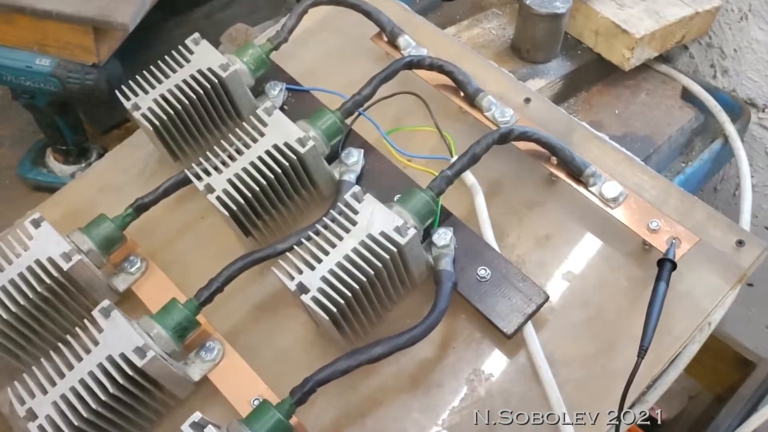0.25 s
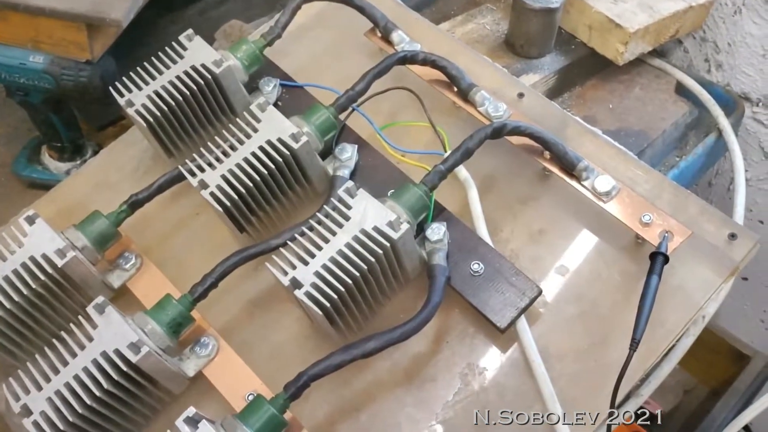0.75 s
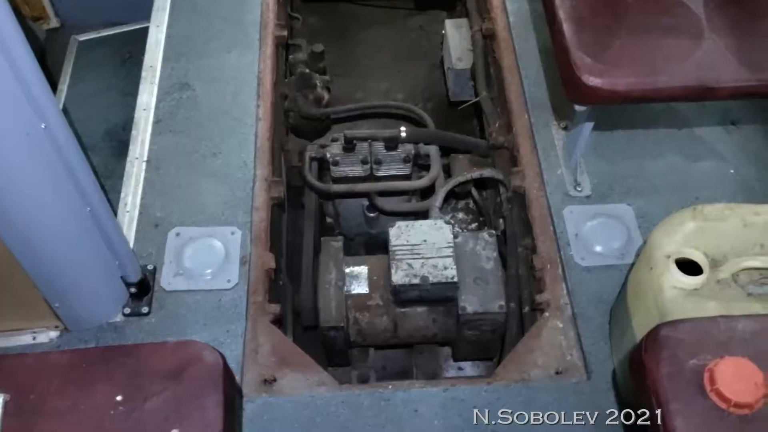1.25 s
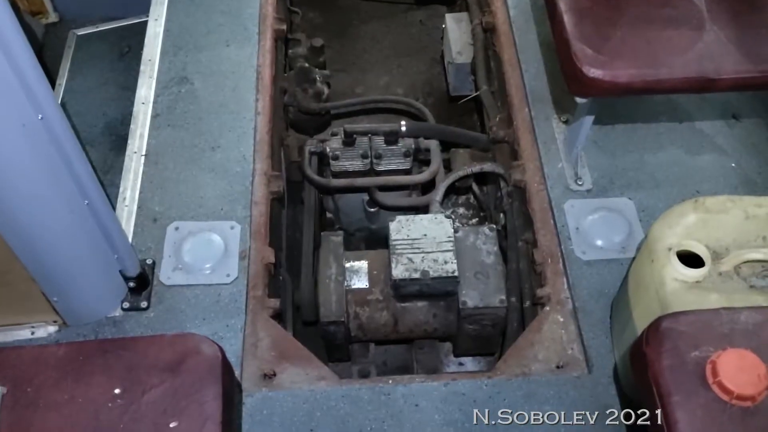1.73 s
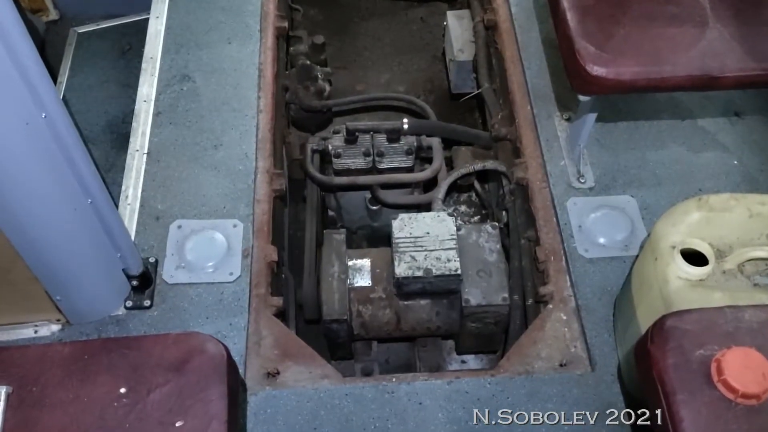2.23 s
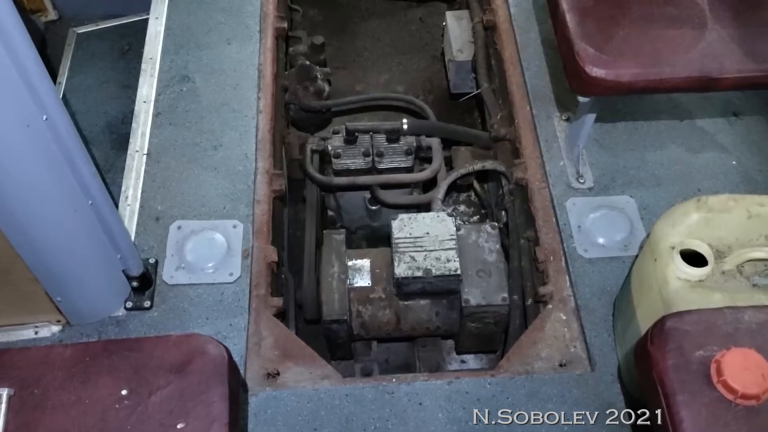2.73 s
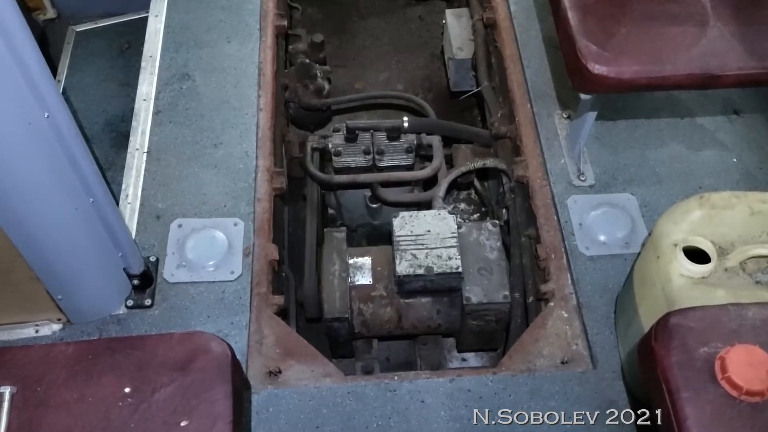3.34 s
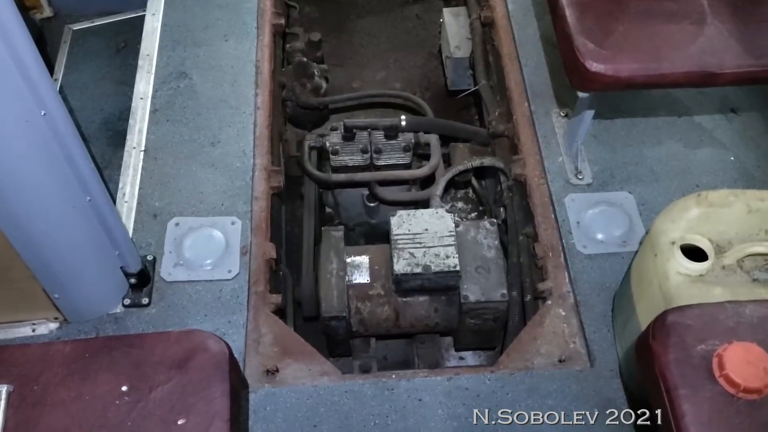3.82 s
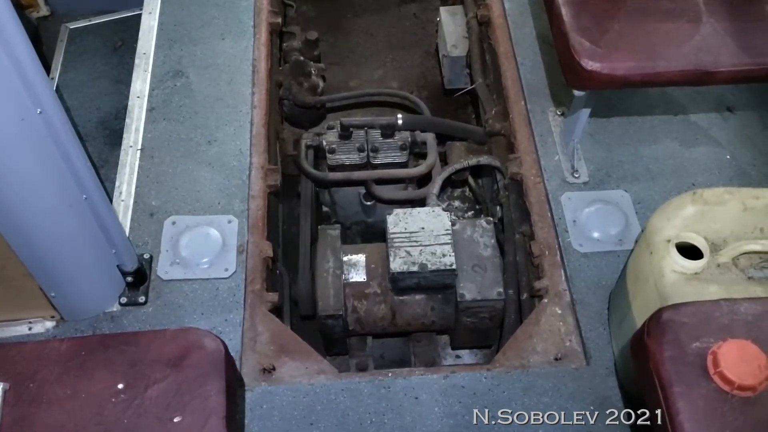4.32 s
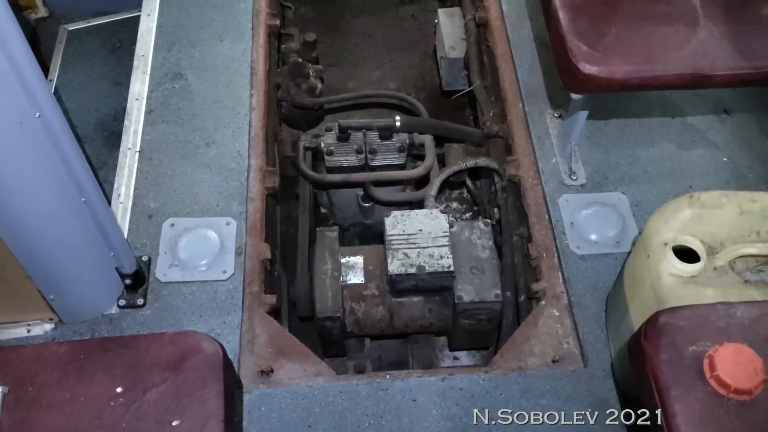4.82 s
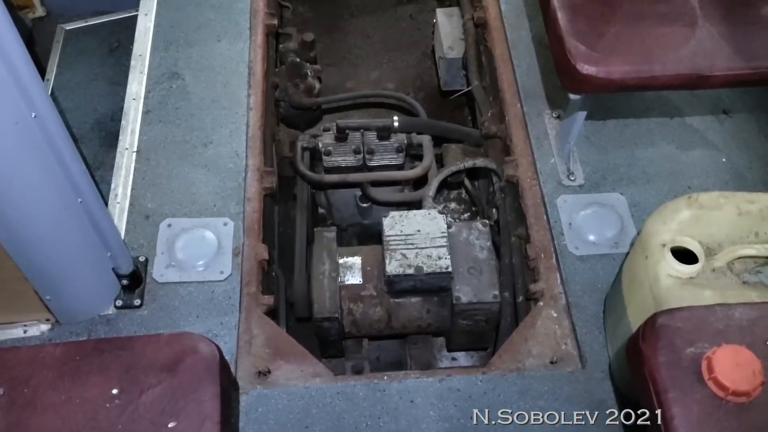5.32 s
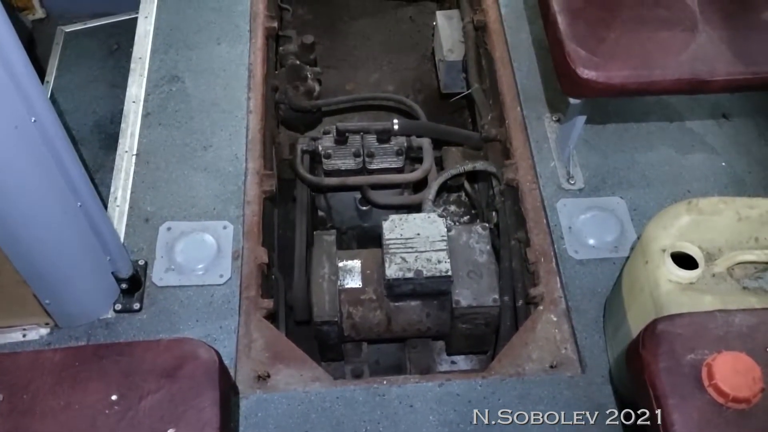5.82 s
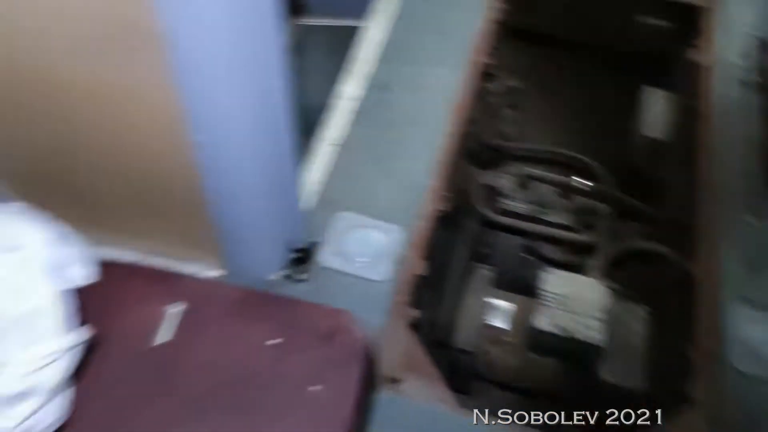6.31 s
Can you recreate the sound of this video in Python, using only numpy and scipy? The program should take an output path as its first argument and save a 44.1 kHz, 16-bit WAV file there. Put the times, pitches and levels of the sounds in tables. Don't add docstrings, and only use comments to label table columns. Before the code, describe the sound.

A faint room hum and soft tap cut to a rapid, rattling two-cylinder compressor with whine and hiss, two dull thumps and a sharp knock.

```python
import sys
import numpy as np
from scipy import signal
from scipy.fft import rfft, irfft
from scipy.io import wavfile
from scipy.ndimage import uniform_filter1d

SR = 44100
rng = np.random.default_rng(int(sys.argv[2]) if len(sys.argv) > 2 else 0)


def digitize_waveform(pressure):
    field = np.atleast_2d(pressure).T
    bounded = np.clip(field, -1, 1)
    quanta = np.round(bounded * 32767).astype(np.int16)
    wavfile.write(sys.argv[1], SR, quanta)


def gain_from_db(level_db):
    decades = np.asarray(level_db, float) / 20
    return 10 ** decades


N = 289296
T, HZ = np.arange(N) / SR, np.fft.rfftfreq(N, 1 / SR)
KNOCK_S = 6.0952
# time in seconds, turns a second.
CRANK_SPEED = [(0, 12.592), (6.56, 12.5753)]


def evened(x):
    return x / np.sqrt(np.mean(x ** 2) + 1e-20)


def read(points, at, column=1):
    table = np.transpose(points)
    return np.interp(np.log(at + 1), np.log(table[0] + 1), table[column])


def drift(hz):
    t = T[::256]
    waves = [np.sin(2 * np.pi * (f * t + rng.random())) for f in np.geomspace(hz / 20, hz, 16)]
    return np.interp(T, t, evened(sum(waves)))


def ring(hz, t60, size=6000, soft=0.):
    t = np.arange(size) / SR
    rise = 1 - np.exp(-t / (soft + 1e-9))
    return np.sin(2 * np.pi * hz * t) * gain_from_db(-60 * t / t60) * rise


def narrow(hz, width):
    pole = np.exp((2j * np.pi * hz - np.pi * width) / SR)
    return evened(signal.lfilter([1], [1, -pole], rng.standard_normal(N) + 0j).real)


def noise(spectrum, same, extra_db=lambda hz, t: 0, patchy_db=1., edge_hz=15520):
    frames, hz = N // 128 + 5, np.fft.rfftfreq(512, 1 / SR)[:, None]
    a, b, c, d, patches = rng.standard_normal((frames, 257, 5)).T
    patches = evened(uniform_filter1d(uniform_filter1d(patches, 6, 0), 20, 1))
    like = np.clip(read(same, hz), -1, 1)
    left = a + 1j * b
    right = like * left + np.sqrt(1 - like ** 2) * (c + 1j * d)
    z = np.array([left, right])
    z *= gain_from_db(patchy_db * patches + extra_db(hz, np.arange(frames) * 128 / SR))
    x = signal.istft(z, nperseg=512, noverlap=384)[1][:, :N]
    return evened(irfft(rfft(x) * gain_from_db(read(spectrum, HZ)) * (HZ < edge_hz), N))


def finger_tap():
    # pitch in Hz, t60 in seconds, left level in dB, right level in dB.
    tap_modes = [(145, 0.013, -6.5, -42), (396, 0.012, -22, -49), (840, 0.007, -20, -38),
                 (1320, 0.0091, -21, -31)]
    out, at = np.zeros((2, N)), round(1.0272 * SR)
    for k, (hz, t60, left_db, right_db) in enumerate(tap_modes):
        sign = (-1) ** (k // 3)
        out[:, at:at + 6000] += sign * gain_from_db([[left_db], [right_db]]) * ring(hz, t60, soft=.0016)
    return out


def workshop():
    # pitch in Hz, level in dB per Hz.
    wash_spectrum = [(25, -28), (50, -13), (110, -12.5), (170, -17), (330, -24.5), (600, -31.5),
                     (1200, -32.5), (2500, -41), (4600, -44.5), (5000, -52.5), (12500, -54), (14800, -66)]
    # pitch in Hz, left-right correlation.
    wash_same = [(60, 0.52), (240, 0.3), (950, -0.054), (3770, 0.0), (15000, -0.096)]
    # time in seconds, level in dB.
    wash_level = [(0.0, -61), (0.588, -59.5), (0.756, -60), (1.1, -59)]
    # pitch in Hz, width in Hz, level in dB.
    far_hum = (79.5, 3, -57)
    wash = noise(wash_spectrum, wash_same, patchy_db=1.0, edge_hz=14900)
    out = gain_from_db(np.interp(T, *np.transpose(wash_level)) + 3.5) * wash
    hz, width, db = far_hum
    out += gain_from_db(db) * evened(np.sin(2 * np.pi * hz * T) + 0.41 * narrow(hz, width))
    out += finger_tap()
    out = irfft(rfft(out) * np.clip(HZ / 71.0, 0, 1), N)
    cut_s = 1.106
    return out * np.clip((cut_s - T) / .003, 0, 1)


def crank(t):
    (_, first), (end, last) = CRANK_SPEED
    start_turns = -.4335
    return start_turns + first * t + (last - first) / end * t ** 2 / 2


def strokes():
    parts = [(3, 8, .3381, .46, .47), (9, 13, .8244, .5868, -.52), (14, 18, .0007, .488, .06),
             (19, 25, .9147, .696, .38), (26, 33, .1261, .2914, .52), (34, 40, .1654, .397, -1.16),
             (41, 46, .4329, .5221, .31), (47, 55, .6582, .376, .05), (56, 63, .5207, .471, 1.03),
             (64, 77, .9491, .2023, .88)]
    # pitch in Hz, width in Hz, share of the second blow.
    bodies = [
        (89, 12, 1),
        (135.8, 19, .74),
        (188, 25, .97),
        (275, 35, .51),
        (342, 28, -.33),
        (499, 20, -.42),
        (599, 83, -.8),
        (601, 26, -.59),
        (692, 31, -.3),
        (910, 175, -.65),
    ]
    part_db = [-39, -27, -34, -39, -40.5, -41.5, -37.5, -39, -44, -56]
    spread = 0.021
    out, grid = np.zeros((2, N)), np.arange(1025) / 1024
    for (first, last, angle, gap, glide), (hz, width, share), level_db in zip(parts, bodies, part_db):
        order = np.arange(first, last + 1)
        blows = 1 + share * np.exp(-2j * np.pi * order * gap)
        mode = 1 / (1 + 2j * (order * CRANK_SPEED[0][1] - hz) / width)
        sweep = np.pi * glide * (order - first) ** 2 / len(order)
        skew = spread * first * rng.standard_normal(len(order)) * np.array([[1], [-1]]) / 2
        z = np.zeros((2, 513), complex)
        z[:, first:last + 1] = blows * mode * np.exp(1j * (skew - sweep))
        one_turn = 512 * np.sqrt(2) * irfft(z)
        place = crank(T) - angle + 0.0017 * drift(4.1)
        sound = np.array([np.interp(place % 1, grid, np.r_[side, side[0]]) for side in one_turn])
        out += gain_from_db(level_db + 0.6 * drift(9.)) * sound
    return out


def whine():
    # pitch in Hz, width in Hz, level in dB.
    housing = [(1060, 40, -47), (1207, 10, -38), (1360, 14, -48), (1588, 14, -42), (1790, 50, -46),
               (1962, 20, -39), (2355, 30, -50), (2675, 50, -49), (4865, 120, -49)]
    apart = np.array([sum(gain_from_db(db) * narrow(hz, width) for hz, width, db in housing) for _ in "LR"])
    load_db = 2.4 * np.cos(2 * np.pi * (crank(T) - .15)) + 1.1 * drift(4.)
    return gain_from_db(load_db + 1.0) * (apart + 0.12 * apart[::-1])


def air():
    # pitch in Hz, level in dB per Hz.
    air_spectrum = [(25, -15), (60, -17.5), (140, -11.5), (230, -8), (400, -14), (560, -18), (775, -18.5),
                    (1150, -12), (2000, -20), (3340, -24), (4700, -22), (6500, -22), (7000, -27.5),
                    (9000, -34), (15000, -29.5)]
    # pitch in Hz, left-right correlation.
    air_same = [(30, 0.9), (150, 1), (280, 0.8), (500, 0.82), (800, 0.71), (1400, 0.56), (15000, 0.13)]
    # pitch in Hz, once-a-turn depth in dB, loudest crank angle in turns,
    # twice-a-turn depth in dB.
    swell = [(500, 0, .2, 0), (2500, 1.3, .17, .2), (4800, 3.4, .17, .9), (6200, 2.7, .12, 1.4),
             (8000, 1.4, .15, .5), (11000, 1.2, .05, .9), (13200, .3, .05, 1.3), (14300, 3.6, .03, 2.)]

    def throb(hz, t):
        once = np.cos(2 * np.pi * (crank(t) - read(swell, hz, column=2)))
        twice = np.cos(4 * np.pi * (crank(t) - .05))
        return read(swell, hz) * once + read(swell, hz, column=3) * twice
    return gain_from_db(-26) * noise(air_spectrum, air_same, throb, patchy_db=0.26)


def valves():
    # crank angle in turns, level in dB.
    ticks = [(.07, -29), (.17, -34), (.275, -29.5)]
    blows = np.zeros((2, N))
    for angle, db in ticks:
        at = np.flatnonzero(np.diff(np.floor(crank(T) - angle)))
        blows[:, at] = gain_from_db(db + 3.1 * rng.standard_normal((len(at), 2)).T)
    reed = ring(4750, .008, size=900) + ring(5900, .006, size=900)
    return signal.oaconvolve(blows, reed[None])[:, :N]


def cabin(ripple_db=3.0, turn_rad=1.62):
    rough = rng.standard_normal((len(HZ), 2, 2)).T
    ripple, turn = uniform_filter1d(uniform_filter1d(rough, 150), 150)
    slow = uniform_filter1d(rng.standard_normal((len(HZ), 2)).T, 2500)
    share = np.clip((HZ - 500) / 600, 0, 1)
    phase = 0.34 * evened(turn) + turn_rad * evened(slow)
    return gain_from_db(share * ripple_db * evened(ripple)) * np.exp(1j * share * phase)


def floor_bumps():
    # time in seconds, pitch in Hz, t60 in seconds, level in dB.
    jolt = (1.393, 45, .05, -21)
    footstep = (2.5, 117, .035, -12)
    out = np.zeros((2, N))
    for s, hz, t60, db in (jolt, footstep):
        at = round(s * SR)
        out[:, at:at + 6000] += gain_from_db(db) * ring(hz, t60, soft=0.0037)
    return out


def knock():
    # pitch in Hz, level in dB, t60 in seconds.
    knock_modes = [(1400, -16, .015), (1750, -16, .04), (4000, -11, .009), (4950, -7, .011),
                   (5900, -11, .009), (7900, -14, .006), (9600, -18, .005), (12000, -19, .004),
                   (14200, -17, .004), (16000, -24, .003)]
    # pitch in Hz, level in dB per Hz.
    tail_spectrum = [(900, -30), (1700, 0), (2600, -12), (3600, -12), (4500, -5), (6300, -4), (6900, -20),
                     (16000, -28)]
    out, at = np.zeros((2, N)), round(KNOCK_S * SR)
    tick = sum((-1) ** k * gain_from_db(db) * ring(hz, t60, soft=.0004) for k, (hz, db, t60) in enumerate(knock_modes))
    out[:, at:at + 6000] = tick * gain_from_db([[-4.], [-1.5]])
    since = T - KNOCK_S
    tail = noise(tail_spectrum, [(100, .3), (9000, .1)], patchy_db=3.)
    return out + gain_from_db(-21.5 - 60 * abs(since) / 0.61) * np.clip((since - .003) / 0.0071, 0, 1) * tail


def scene():
    # pitch in Hz, left minus right in dB.
    lean = [(60, 2.5), (150, -1), (300, 1.5), (600, 2), (950, -2), (2380, -1), (5980, -2.0), (9000, 1),
            (15000, -4)]
    # pitch in Hz, width in Hz, depth in dB.
    dips = [(2950, 160, -5), (3350, 200, -6), (3950, 350, -5.5), (7100, 250, -4), (8400, 400, -4),
            (8920, 200, -9), (10000, 300, -5), (11500, 500, -4), (13800, 300, -3)]
    # time in seconds, level in dB.
    fade = [(1.192, -41), (1.2, -26.5), (1.238, -14.5), (1.33, -6.5), (1.385, -3.5), (1.395, -2.5),
            (1.45, 2), (1.6, 1.5), (6.56, 1.5)]
    spectrum = rfft(strokes() + whine()) + cabin() * rfft(air() + valves())
    colour_db = read(lean, HZ) * np.array([[.5], [-.5]])
    colour_db += sum(db * np.exp(-((HZ - hz) / width) ** 2 * 2) for hz, width, db in dips)
    machine = irfft(spectrum * gain_from_db(colour_db), N)
    duck_db = -7 * np.exp(-((T - KNOCK_S + .002) / .003) ** 2)
    machine = machine * gain_from_db(duck_db) + floor_bumps() + knock()
    fade_from_s = 1.192
    return workshop() + machine * gain_from_db(np.interp(T, *np.transpose(fade))) * (T > fade_from_s)


def low_pass(x):
    return signal.sosfilt(signal.butter(12, 16670, fs=SR, output="sos"), x)


def record(dry):
    # pitch in Hz, dB a band may sink under its neighbours before it is dropped.
    mask = [(2500, 9), (4500, 8.5), (7000, 6), (8500, 4), (12000, 3.5), (14200, 6.5), (15500, 9)]
    hz, _, z = signal.stft(dry, SR, nperseg=1024, noverlap=768)
    power = uniform_filter1d((abs(z) ** 2).mean(0), size=7, axis=1)
    near = uniform_filter1d(power, size=3, axis=0)
    wide = uniform_filter1d(power, size=61, axis=0)
    budget = rng.standard_normal(power.shape[::-1]).T
    budget = evened(uniform_filter1d(uniform_filter1d(budget, size=5, axis=0), size=6, axis=1))
    margin_db = 10 * np.log10(abs(near) / (abs(wide) + 1e-20) + 1e-9)
    margin_db = margin_db + read(mask, hz)[:, None] + 3.2 * budget
    keep = np.where(hz[:, None] > 2500, np.clip(margin_db, 0, 1), 1)
    thinned = signal.istft(z * keep, SR, nperseg=1024, noverlap=768)[1][:, :N]
    return low_pass(thinned)


dry = scene()
out = record(dry)
digitize_waveform(out)
```